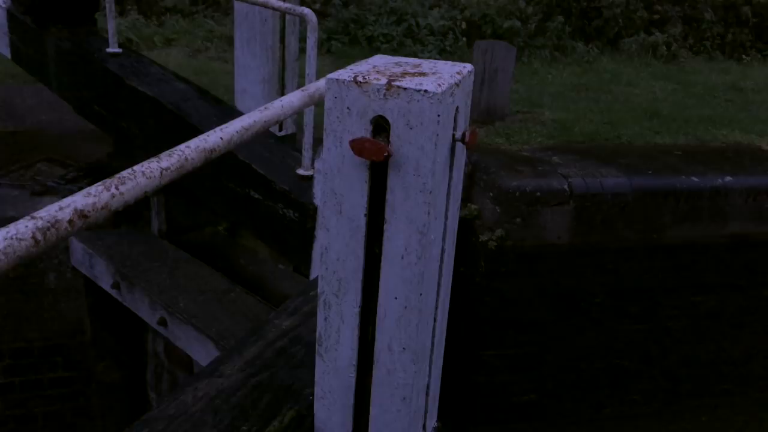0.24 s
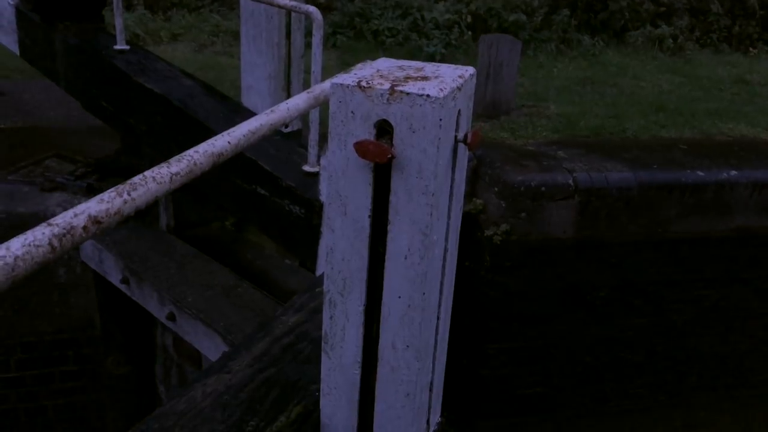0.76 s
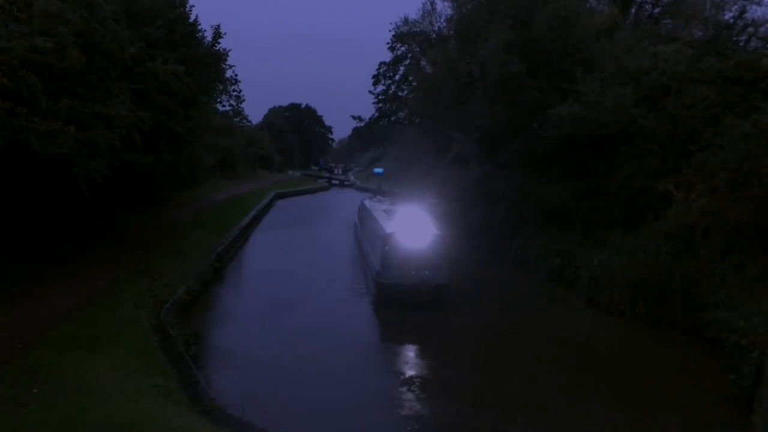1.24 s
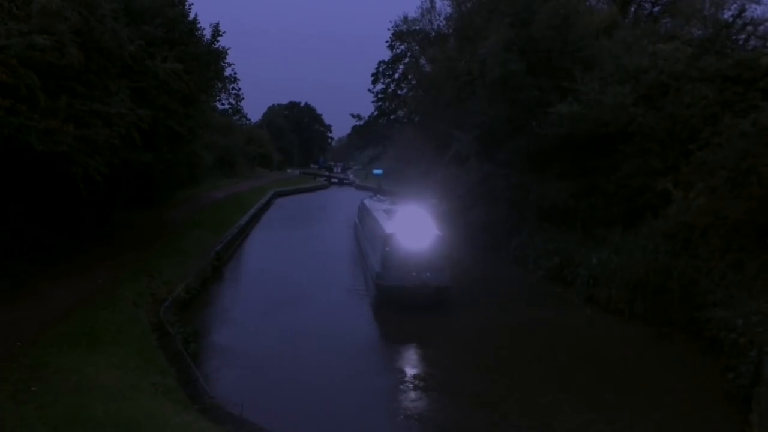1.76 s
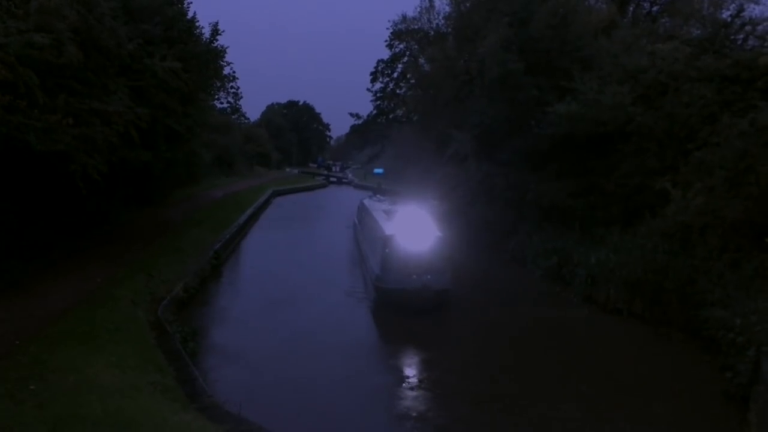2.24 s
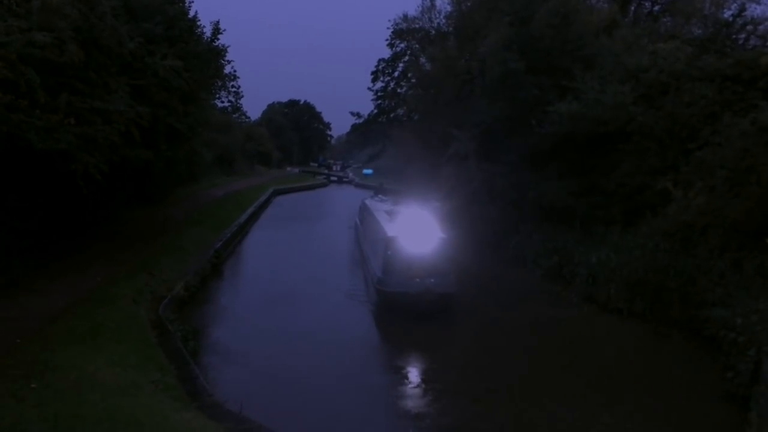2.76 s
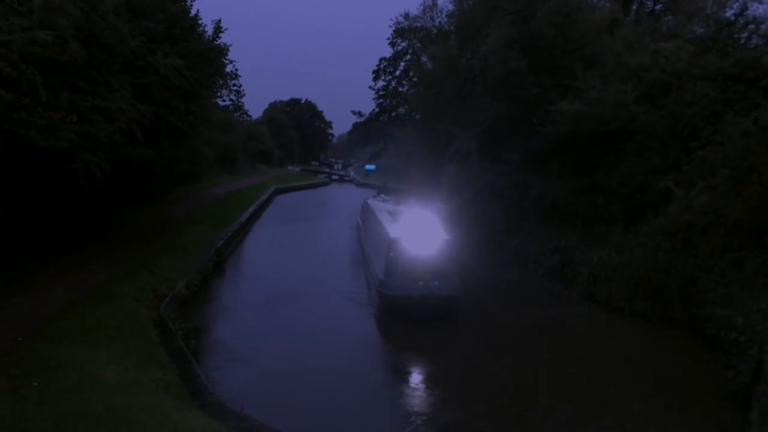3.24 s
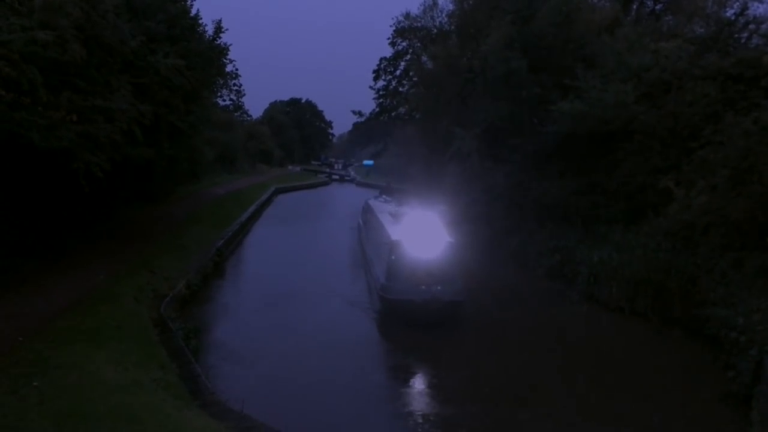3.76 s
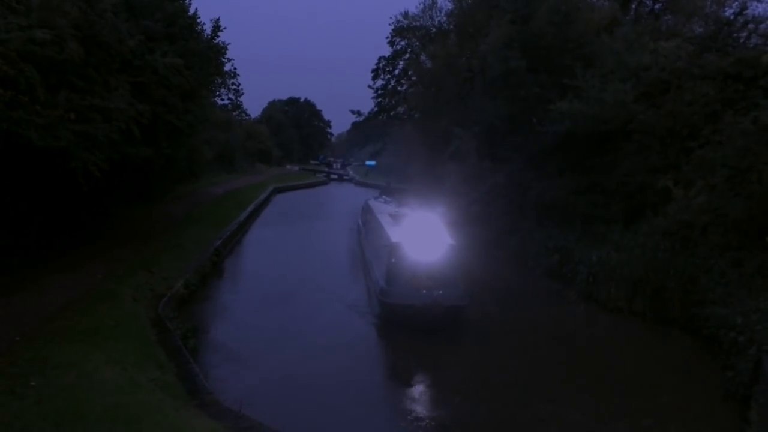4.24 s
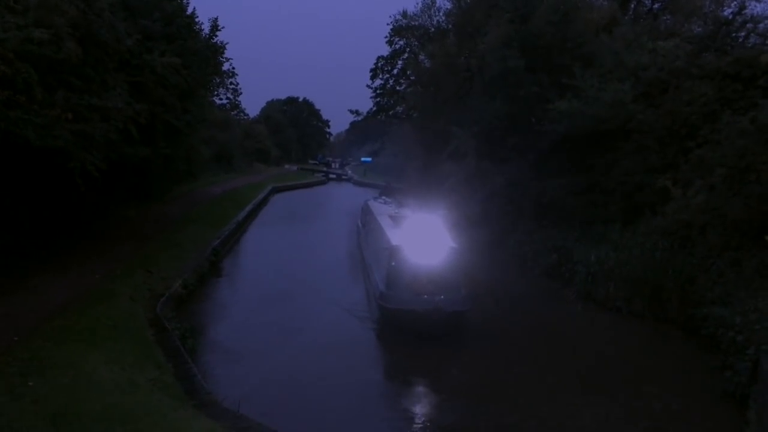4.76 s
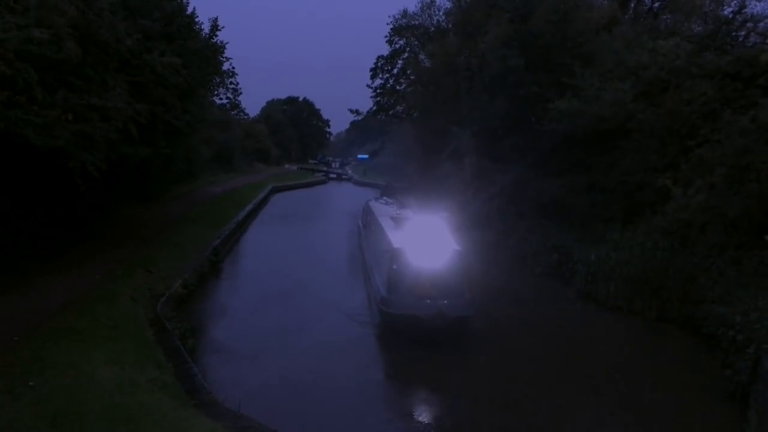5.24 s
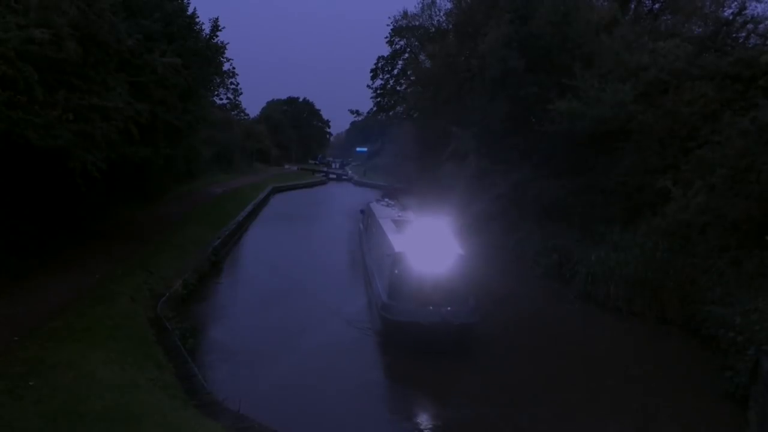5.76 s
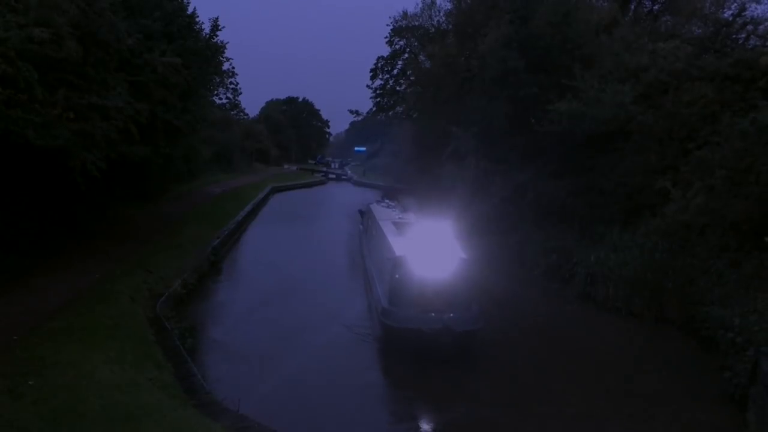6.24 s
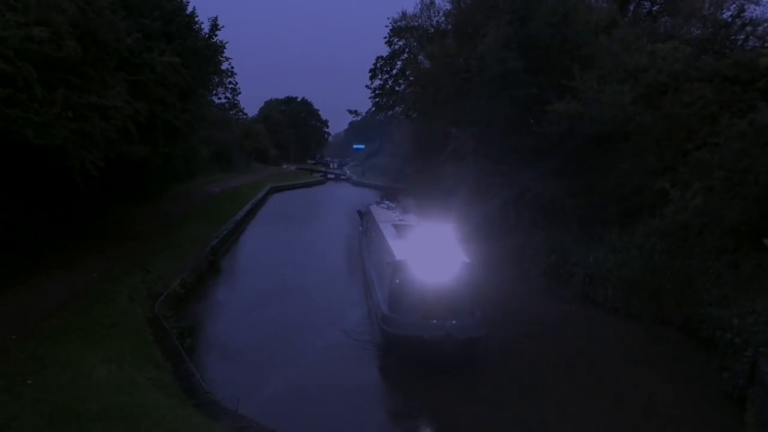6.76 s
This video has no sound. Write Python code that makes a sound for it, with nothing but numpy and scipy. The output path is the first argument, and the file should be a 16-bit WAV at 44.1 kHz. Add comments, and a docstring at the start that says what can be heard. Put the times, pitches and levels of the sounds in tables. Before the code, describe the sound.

Water pours through a lock gate, bright spray with froth and gurgles, while low wind lumps hit the microphone. Under a second in, it cuts hard to a much quieter open canal: a narrowboat diesel thuds fast and low, with soft puffs and block clatter, creeping closer. Dry ticks, a plop and camera bumps come first; later a small metal piece clinks repeatedly close by over faint hiss.

```python
"""A narrowboat's diesel thuds across the water: harmonics of its firing rate, pulsing puffs, clatter and a whirr.
Before it, water pours through canal lock gates as shaped noise and bubbles while wind buffets the microphone;
that rush is cut off abruptly. Around the engine lie bubbling bow wash, faint crackle and a steady noise hiss.
Close by, a small metal piece clinks in ringing modes, damped bursts tick, and low swells bump the camera."""
import sys
import numpy as np
from scipy.fft import rfft, irfft, next_fast_len
from scipy.io import wavfile
from scipy.ndimage import map_coordinates

SR = 44100
rng = np.random.default_rng(int(sys.argv[2]) if len(sys.argv) > 2 else 0)


def waveform_to_disk(signal):
    """Save audio, clipped to [-1, 1], as 16-bit WAV at the path in sys.argv[1]."""
    frames = np.transpose(np.atleast_2d(signal))
    scaled = np.clip(frames, -1, 1) * 32767
    samples = np.round(scaled).astype(np.int16)
    wavfile.write(sys.argv[1], SR, samples)


N = 308259

CUT_S = 0.838  # the lock gives way to the canal
TOP_HZ = 15800  # upper band limit

# diesel: exhaust harmonics: firing_multiple [ratio], level_db [dB]
FIRING_HZ = 35.43
EXHAUST_ORDERS = [(1, -3), (1.5, -14), (2, 0.5), (3, -12), (3.5, -15), (4, -5), (5, -15), (6, -23),
                  (7.5, -29.5), (9.25, -24)]
# rough breath of the exhaust pipe: freq_hz [Hz], level_db [dB per Hz]
PIPE_SPECTRUM = [(22, -38), (32, -15), (55, 0.5), (90, -8.5), (125, -4), (165, -12.5), (205, -13.5),
                 (235, -24.5), (400, -29), (900, -45.5)]
# clatter of the engine block: freq_hz [Hz], level_db [dB per Hz]
BLOCK_SPECTRUM = [(210, 3.5), (350, -5), (520, -7.5), (720, -3.5), (900, -9), (1050, -6.5), (1550, -6),
                  (1900, -7), (2400, -7.5), (2850, -14.5), (3200, -9.5), (4000, -14), (5000, -20),
                  (7000, -34)]
# moments when the throb sinks: centre_s [s], half_length_s [s], depth_db [dB]
THROB_LULLS = [(0.85, 0.28, 11), (4.98, 0.21, 8.5), (5.95, 0.43, 4)]
# engine layers at CUT_S, then their drift as the boat creeps closer
EXHAUST_DB, PUFF_DB, CLATTER_DB, WHIRR_DB = -52, -53.5, -63.4, -70
EXHAUST_GROWS_DB_PER_S, CLATTER_GROWS_DB_PER_S, WHIRR_FADES_DB_PER_S = 0.48, 0.1746, 0.8

# spray of the falling water: freq_hz [Hz], level_db [dB per Hz]
SPILL_SPECTRUM = [(150, -30), (230, -4), (300, 1), (450, -4.5), (650, -1.5), (850, 0.5), (1300, -2),
                  (2100, -5.5), (2800, -6), (4300, -12), (5000, -15.5), (5900, -9), (7700, -15),
                  (14400, -14), (15800, -19)]
# strength of the rush: time_s [s], level_db [dB]
WATER_LEVEL = [(0.0, -42.5), (0.21, -43.5), (0.53, -39.5), (0.75, -41), (0.83, -42)]
# wind rumble on the microphone: freq_hz [Hz], level_db [dB per Hz]
BUFFET_SPECTRUM = [(24, -23), (37, -3.5), (68, 3.5), (115, -4.5), (160, -13), (230, -21), (500, -59)]
BUFFET_DB, BUFFET_EASES_DB_PER_S = -36, 6.5  # level at the start; the gust dies away
# moments when the wind drops: centre_s [s], half_length_s [s], depth_db [dB]
WIND_LULLS = [(0.2, 0.011, 12), (0.558, 0.024, 13), (0.772, 0.021, 19)]
# eddies slapping the microphone: start_s [s], peak_db [dB], pitch_hz [Hz], half_rise_s [s]
EDDIES = [(0.030, -29.5, 70.1, 0.02), (0.076, -24.5, 61.5, 0.0064), (0.217, -25, 109, 0.0027),
          (0.254, -29, 145.6, 0.0034), (0.305, -30.5, 82, 0.0054), (0.433, -30, 117, 0.0028),
          (0.609, -31.5, 69.4, 0.0028), (0.690, -35.5, 69.4, 0.0063), (0.818, -37.5, 76.6, 0.0056)]

# strikes of the small metal piece: start_s [s], level_db [dB], t60_s [s]
CLINKS = [(3.240, -52, 0.024), (4.486, -52, 0.025), (4.588, -51.5, .04), (4.850, -51.5, 0.13),
          (4.969, -47.5, .015), (5.120, -48.5, 0.045), (5.231, -52, 0.028), (5.336, -44.5, 0.057),
          (5.433, -47.5, 0.025), (5.666, -49.5, 0.022), (5.794, -55, .04), (6.017, -45, 0.037),
          (6.145, -44, .09), (6.261, -48, 0.05), (6.380, -46, 0.041), (6.927, -48.5, 0.045)]
# ringing modes of the metal: pitch_hz [Hz], level_db [dB], t60_share [ratio]
METAL_MODES = [(1996, -11, 1.1), (3390, -12, 1.1), (3500, 3, 0.6), (3970, -15, 0.9), (5750, -19, 0.88),
               (6540, -16, 0.78)]
# clearest dry ticks: start_s [s], level_db [dB], pitch_hz [Hz]
TICKS = [(1.159, -39, 13900), (1.358, -45.5, 1760), (1.386, -47.5, 2290), (2.270, -38.5, 2000),
         (2.440, -44, 2390), (2.771, -45, 2200), (2.898, -44.5, 1690), (3.05, -46, 11000),
         (3.104, -47, 13000), (3.331, -44, 2090), (3.397, -45.5, 2200), (3.698, -47, 1980),
         (4.193, -50, 2600), (5.146, -43, 2440), (5.371, -43.5, 2400), (5.596, -46, 1430),
         (5.666, -47, 3200), (5.694, -46, 2000), (5.878, -46, 4000), (6.954, -46, 2200)]
# fainter ticks at random moments: typical level and pitch, with their standard deviations
STRAY_DB, STRAY_SPREAD_DB, STRAY_HZ, STRAY_OCTAVES = -49, 1.5, 2300, 0.38
# bumps on the camera: start_s [s], peak_db [dB], pitch_hz [Hz], half_rise_s [s]
BUMPS = [(1.119, -45.5, 297, 0.0013), (1.158, -48, 500, 0.0011), (2.942, -39, 300, 0.0006),
         (2.935, -33, 102, 0.0056), (2.944, -27, 64, 0.011), (3.032, -35.5, 64, 0.0051),
         (3.072, -36, 63, 0.0058), (5.190, -40, 121, 0.0042), (5.241, -36, 84, 0.0054)]
# one sharp plop: start_s [s], peak_db [dB], first_hz [Hz], last_hz [Hz], half_rise_s [s]
PLOP = (1.6492, -26.7, 820, 100, .0011)

# moments when the crackle swells: centre_s [s], half_length_s [s], rise_db [dB]
FLURRIES = [(3.39, .06, 5), (5.15, .06, 6), (5.84, 0.14, 8.5), (6.8, 0.13, 7)]
CRACKLE_DB, CRACKLE_GROWS_DB_PER_S = -75.5, 0.7  # resting level at CUT_S, and its growth
WASH_DB, WASH_GROWS_DB_PER_S = -86, 2.5  # level at CUT_S, too far off to hear, and its growth
# faint steady hiss: freq_hz [Hz], level_db [dB per Hz]
HISS_SPECTRUM = [(300, -4.5), (3000, 3), (4900, -5), (5800, 3.5), (6700, 2), (7700, -3.5), (9200, 1.5),
                 (10400, -5), (11200, 0), (14000, 0.5), (15800, -4)]


def diesel():
    """Each firing puffs from the exhaust and rattles the block; both grow as the boat nears."""
    elapsed = since_cut()
    throb_db = EXHAUST_GROWS_DB_PER_S * elapsed - humps(THROB_LULLS)
    clatter_db = CLATTER_DB + CLATTER_GROWS_DB_PER_S * elapsed
    whirr_db = WHIRR_DB - WHIRR_FADES_DB_PER_S * elapsed
    firings = np.cumsum(FIRING_HZ * (1 + 0.00414 * wobble(3))) / SR
    beat = np.cos(2 * np.pi * firings)

    # whole multiples line up into one thud per firing; those in between come from uneven running
    thud = np.zeros(N)
    for multiple, db in EXHAUST_ORDERS:
        thud += amp(db + 1.36 * wobble(7)) * np.cos(2 * np.pi * multiple * firings)
    puffs = coloured(noise() * amp(1.4 * beat), PIPE_SPECTRUM)
    # the puffs follow the throb, more gently
    puff_db = PUFF_DB + 0.33 * throb_db + 0.33 * wobble(2.97)
    exhaust = amp(EXHAUST_DB + throb_db) * unit(thud) + amp(puff_db) * puffs

    rattle = coloured(noise(), BLOCK_SPECTRUM)
    clatter = amp(clatter_db + 1.3 * beat + 0.63 * wobble(12)) * rattle
    narrow_band = unit(resonance(resonance(noise(), 915, 62), 913, 62))
    whirr = amp(whirr_db + 1.3 * beat + 1.0 * wobble(10)) * narrow_band
    return exhaust + clatter + whirr


def lock_water():
    """Spray, fine froth and larger gurgles under the gate, with lumps of wind on the microphone."""
    water_db, = curves(WATER_LEVEL)
    spray = coloured(noise() * amp(1.16 * wobble(90.9)), SPILL_SPECTRUM)
    froth = bubbles(count=5000, centre_hz=3770, spread=0.65, cycles=4.0, size_db=4.5, rise=0.061)
    gurgle = bubbles(count=1100, centre_hz=948, spread=0.4, cycles=6.9, size_db=2.5, rise=0.053)
    water = amp(water_db) * (amp(-1.0) * spray + amp(-10) * froth + amp(-9.0) * gurgle)
    buffet_db = BUFFET_DB - BUFFET_EASES_DB_PER_S * np.arange(N) / SR - humps(WIND_LULLS)
    wind = amp(buffet_db) * coloured(noise(), BUFFET_SPECTRUM) + thumps(EDDIES)
    return water + wind


def clinks():
    """A small metal piece swings against its fitting, which soon damps the ring."""
    track, t = np.zeros(N), np.arange(SR // 6) / SR
    for s, db, t60 in CLINKS:
        ring = np.zeros(len(t))
        for hz, level, share in METAL_MODES:
            level_jitter, pitch_jitter = rng.standard_normal(2)
            # the damping grows as the piece settles
            decay_db = 60 * (t / (t60 * share)) ** 1.55
            struck_hz = hz * (1 + 0.0036 * pitch_jitter)
            ring += amp(level + 0.94 * level_jitter - decay_db) * np.sin(2 * np.pi * struck_hz * t)
        contact = resonance(rng.standard_normal(len(t)) * amp(-60 * t / 0.059), 4100, 4200)
        attack = 1 - np.exp(-t / 0.00073)
        add(track, s, amp(db - 3.5) * (ring + amp(-5.5) * contact) * attack)
    return track


def ticks():
    """Tiny dry snaps: a sharp crack, a cycle or two of ring and a short crumbling tail."""
    track, t = np.zeros(N), np.arange(SR // 20) / SR
    for s, db, hz in [*TICKS, *stray_ticks(count=22)]:
        burst = rng.standard_normal(len(t)) * amp(-60 * t / 0.023)
        width_hz = 1100 + 0.35 * hz
        crumbs = resonance(resonance(burst, hz, width_hz), hz, width_hz)
        snap = np.sin(2 * np.pi * hz * t) * np.exp(-t * hz / 2.3)
        crack = burst * amp(-5.0 - 60 * t / 0.0054)
        add(track, s, amp(db) * (0.91 * snap + 0.56 * crumbs / np.abs(crumbs).max() + crack))
    return track


def stray_ticks(count):
    """Rows of start_s, level_db, pitch_hz for faint ticks, growing more frequent with time."""
    when = np.sqrt(rng.random(count))
    size, pitch = rng.standard_normal((2, count))
    start_s = CUT_S + when * (N / SR - CUT_S)
    level_db = STRAY_DB + STRAY_SPREAD_DB * size
    pitch_hz = STRAY_HZ * 2 ** (STRAY_OCTAVES * pitch)
    return list(zip(start_s, level_db, pitch_hz))


def bumps():
    """Soft knocks on the camera, and one plop that falls quickly in pitch."""
    track, t = thumps(BUMPS), np.arange(SR // 20) / SR
    s, db, first_hz, last_hz, half_rise_s = PLOP
    pitch_hz = last_hz + (first_hz - last_hz) * np.exp(-t / 0.0023)
    plop = np.sin(2 * np.pi * np.cumsum(pitch_hz) / SR)
    add(track, s, amp(db) * swell(t, half_rise_s) * plop)
    return track


def crackle():
    """Faint crisp grains swell in short clumps, with stray pinpoint clicks high above."""
    crackle_db = CRACKLE_DB + CRACKLE_GROWS_DB_PER_S * since_cut() + humps(FLURRIES)
    grains = bubbles(count=3000, centre_hz=2028, spread=0.381, cycles=4.5, size_db=3, rise=0.027)
    clumps = unit(grains * amp(4.3 * wobble(30)))
    pinpoints = bubbles(count=140, centre_hz=8000, spread=0.5, cycles=0.94, size_db=3.0, rise=0)
    return amp(crackle_db) * clumps + amp(-78.5) * pinpoints


def bow_wash():
    """Soft low gurgles at the bow come up out of the engine noise as the boat nears."""
    gurgle = bubbles(count=2500, centre_hz=650, spread=0.602, cycles=5.1, size_db=1.8, rise=0.047)
    wash_db = WASH_DB + WASH_GROWS_DB_PER_S * since_cut()
    return amp(wash_db) * unit(gurgle * amp(1.5 * wobble(12)))


def hiss():
    """A faint steady bed of shaped noise."""
    return amp(-67.5) * coloured(noise(), HISS_SPECTRUM)


def bubbles(count, centre_hz, spread, cycles, size_db, rise):
    """A cloud of short damped tones, at rms 1; a positive rise bends each pitch upward as it starts to fade."""
    length = SR // 60
    start = rng.integers(0, N, count)
    hz = np.clip(centre_hz * np.exp(spread * rng.standard_normal(count)), 250, 14000)
    size = amp(size_db * np.minimum(rng.exponential(size=count), 4))
    turns = hz[:, None] * np.arange(length) / SR
    age = turns / cycles
    tone = np.sin(2 * np.pi * turns * (1 + rise * np.minimum(age, 2)))
    grain = size[:, None] * tone * np.exp(-age)
    place = start[:, None] + np.arange(length)
    return unit(np.bincount(place.ravel(), grain.ravel(), N)[:N])


def thumps(rows):
    """Soft blows: low tones that swell and die within a few cycles."""
    track, t = np.zeros(N), np.arange(SR // 4) / SR
    for s, db, hz, half_rise_s in rows:
        add(track, s, amp(db) * swell(t, half_rise_s) * np.sin(2 * np.pi * hz * t))
    return track


def swell(t, half_rise_s):
    """A soft rise and fall that peaks at 1 after twice half_rise_s."""
    return (t / half_rise_s / 2) ** 2 * np.exp(2 - t / half_rise_s)


def humps(rows):
    """A dB curve of smooth bells, one for each centre_s, half_length_s, height in dB."""
    t = np.arange(N) / SR
    return sum(db * np.exp(-((t - s) / half_s) ** 2) for s, half_s, db in rows)


def since_cut():
    """Seconds since the canal was first heard, negative before."""
    return np.arange(N) / SR - CUT_S


def amp(db):
    """Decibels to gain."""
    return 10 ** (np.asarray(db) / 20)


def unit(x):
    """Scale to rms 1."""
    return x / np.sqrt(np.mean(x ** 2) + 1e-20)


def curves(rows):
    """One value per sample for each column after the time."""
    s, *cols = np.transpose(rows)
    return [np.interp(np.arange(N) / SR, s, c) for c in cols]


def wobble(rate):
    """A smooth random curve, rate knots a second."""
    knots = rng.standard_normal(int(N * rate / SR) + 4)
    return map_coordinates(knots, [np.arange(N) * rate / SR])


def filtered(x, response):
    """x times a response of frequency."""
    m = next_fast_len(len(x) + 8192)
    return irfft(rfft(x, m) * response(np.fft.rfftfreq(m, 1 / SR)), m)[:len(x)]


def coloured(x, points):
    """x shaped by (Hz, dB) points on a log axis, at rms 1."""
    f, db = np.transpose(points)
    return unit(filtered(x, lambda hz: amp(np.interp(np.log(hz + 1), np.log(f), db, left=-120))))


def resonance(x, centre_hz, width_hz):
    """x through one causal resonance."""
    return filtered(x, lambda f: 1j * f * width_hz / (centre_hz ** 2 - f ** 2 + 1j * f * width_hz))


def noise():
    """White noise of rms 1."""
    return rng.standard_normal(N)


def add(track, s, sound):
    """Mix a sound into the track at time s."""
    part = track[max(round(s * SR), 0):][:len(sound)]
    part += sound[:len(part)]


def scene():
    """The lock, then within a few milliseconds the open canal."""
    at_lock = np.clip(-since_cut() / 0.003, 0, 1)
    canal = diesel() + clinks() + ticks() + bumps() + crackle() + bow_wash() + hiss()
    return (at_lock * lock_water() + (1 - at_lock) * canal)[None]


def record(dry):
    """Remove everything above the band limit."""
    return filtered(dry[0], lambda hz: hz < TOP_HZ)[None]


dry = scene()
out = record(dry)
waveform_to_disk(out)
```